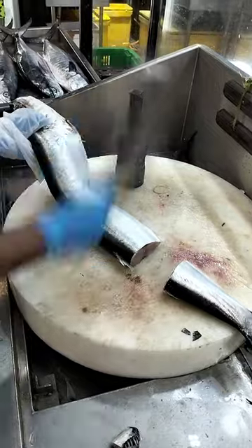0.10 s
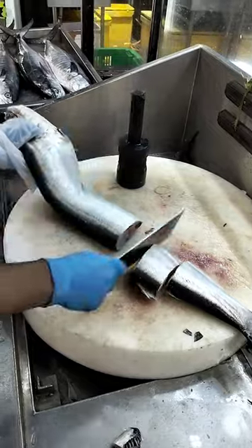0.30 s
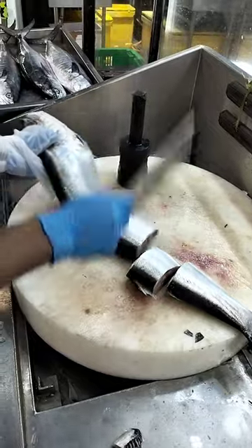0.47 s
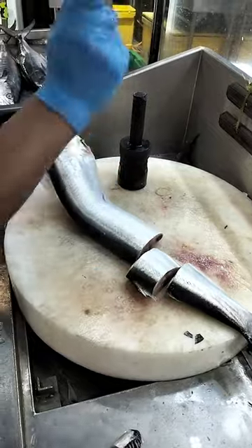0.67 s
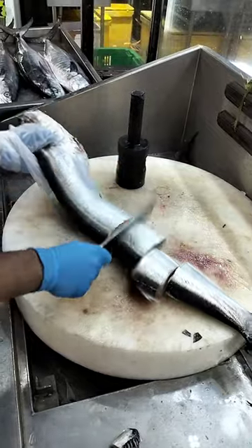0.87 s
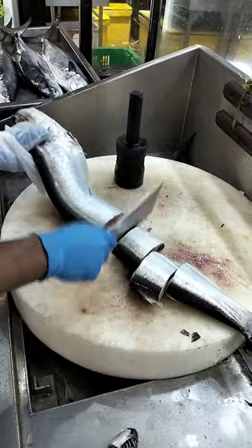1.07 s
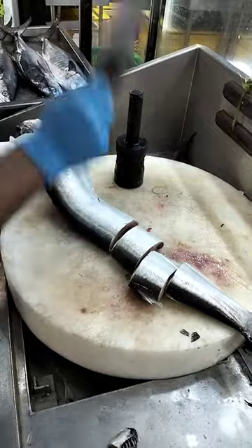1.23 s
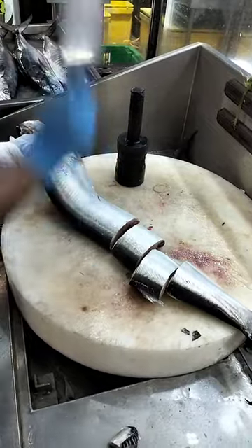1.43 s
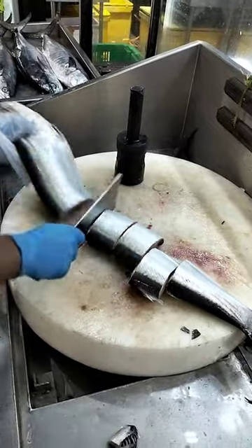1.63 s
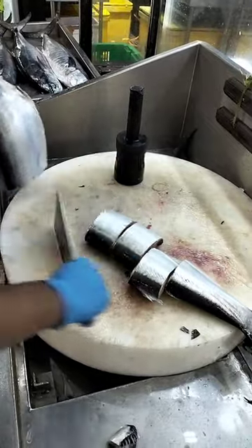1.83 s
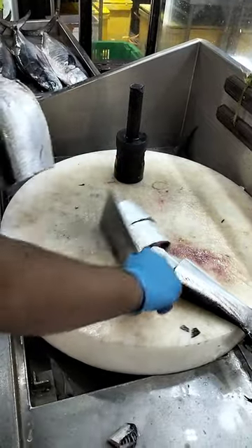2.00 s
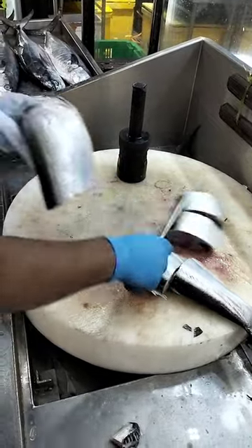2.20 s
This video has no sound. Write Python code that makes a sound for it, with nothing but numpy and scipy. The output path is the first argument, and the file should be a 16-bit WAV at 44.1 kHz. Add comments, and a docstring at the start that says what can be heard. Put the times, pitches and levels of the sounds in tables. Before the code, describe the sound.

Three hard cleaver blows thud and ring on a chopping block, followed by a metallic blade scrape

```python
"""Over low machine noise in a hall, a heavy cleaver chops three times through a fish, close to a phone.
Each blow on the thick round block in a steel basin stacks a burst of noise and a gliding squeak for the skin,
the block's ring and short modes, the basin's slow boom and a banded noise tail; noise swishes ahead of the first two.
At the end the blade scrapes the pieces aside: grainy noise through resonances, over a rumble of the basin.
Behind it all run coloured noise, a swelling hum, sparse crackles and briefly a faint thin tone."""
import sys
import numpy as np
from scipy import signal
from scipy.fft import rfft, irfft
from scipy.io import wavfile
from scipy.ndimage import uniform_filter1d

SR = 44100
rng = np.random.default_rng(int(sys.argv[2]) if len(sys.argv) > 2 else 0)


def volts_from_db(level):
    """Convert decibel levels to linear amplitude ratios."""
    exponent = np.asarray(level, float) / 20
    return 10 ** exponent


def put_to_file(sound):
    """Save the sound as 16-bit audio at rate SR, in the file named by the first command-line argument."""
    columns = np.atleast_2d(sound).T  # one column per channel
    safe = np.clip(columns, -1, 1)
    whole_steps = np.round(safe * 32767)
    wavfile.write(sys.argv[1], SR, whole_steps.astype(np.int16))


N = 101429
t = np.arange(N) / SR

# Colour of the machine noise: (frequency [Hz], relative density [dB])
HALL_COLOUR = [(40, -10), (108, -2.5), (170, -1.5), (516, -14), (1100, -16), (1400, -15), (2350, -25.5),
               (4370, -25.5), (6000, -36.5), (9000, -46.5), (11700, -41.5), (15700, -57)]
# Swelling hum: (time [s], peak level [dB])
HUM_LEVEL = [(0, -65), (.45, -44), (2.3, -37.5)]
# Faint thin tone: (time [s], level [dB])
TONE_LEVEL = [(1.359, -61), (1.438, -47.5), (1.57, -51)]
# Colour of the crackles: (frequency [Hz], relative density [dB])
CRACKLE_COLOUR = [(2000, -20), (5000, 0), (16000, -6)]
HALL_DB, HUM_HZ, TONE_HZ = -40.5, 105, 1179
CRACKLES_PER_S, CRACKLE_DB = 16, -71

# Ringing modes of the blade: frequency [Hz]
BLADE_HZ = [2480, 3520, 3860, 4010, 4790, 6120, 7000, 7660, 9070, 9420, 11330, 13200, 15400]
# The same modes' balance: (edge landing [dB], sweeping [dB], sliding out [dB])
BLADE_BALANCE = [(-12, -7.5, -17), (2, 4, -6), (-7, -3, -9), (-1, -7.5, 0), (-2, -1.5, -14),
                 (-6.5, -7.5, -14), (-24, -30, -15), (-14.5, -18, -10.5), (-23, -26, -21), (-7.5, -21, -11),
                 (-16, -16, -13), (-27, -26, -19), (-28, -34, -17)]
# Colour of the blade's rasp: (frequency [Hz], relative density [dB])
RASP_COLOUR = [(1000, -17.0), (3500, 16.5), (6000, 1), (9000, -14), (15500, -10)]
# Low scraping resonances: (frequency [Hz], width [Hz], relative level [dB])
DRAG_MODES = [(1620, 28, 1.5), (1647, 15, 6), (1730, 36, -7.5)]
# Scrape over the block: (time [s], blade level [dB], low scrape level [dB])
SCRAPE_LEVEL = [(1.93, -65, -68), (1.962, -40, -49), (2.003, -31.5, -41), (2.024, -37.5, -44),
                (2.042, -45, -59), (2.068, -34.5, -40), (2.095, -44.5, -35.5), (2.14, -41, -42),
                (2.27, -43.5, -35), (2.3, -59, -45)]
# Blade sliding out: (time [s], level [dB])
WITHDRAW_LEVEL = [(.3, -49), (.325, -44), (.355, -41.5), (.375, -46.5), (.43, -56)]
# Pieces sliding dully: (time [s], level [dB])
SHOVE_LEVEL = [(1.95, -60), (2.08, -35), (2.16, -44.5), (2.27, -32)]
# Colour of the sliding pieces: (frequency [Hz], relative density [dB])
SHOVE_COLOUR = [(100, -26.5), (145, 14), (260, -4), (600, -38)]
# Rumble of the basin: (time [s], level [dB])
RUMBLE_LEVEL = [(1.85, -50), (1.9, -32), (2.0, -30.5), (2.06, -43)]
RASP_DB, GRAIN_DB, RUMBLE_HZ = -6.5, 0.5, 86
FLICKER_DB, BLADE_WIDTH_HZ = 4.5, 36
LANDED_S = 2.08  # middle of the crossfade from landing to sweeping

# The three blows: (blade meets block [s], tail [dB], ring [dB], basin [dB], thud [dB], knock [dB],
# knock decay stretch [factor], slice [dB], bite [dB], swish [dB])
CHOPS = [(0.2083, 3.5, -1.5, -1, -3.5, -4.5, 0.76, -15, -16, -37),
         (0.9033, 2, -3, 1.5, -2, -3, 0.5, -19.5, -16.5, -33),
         (1.58, 2, -3, 6, -1.5, -4.5, 1.42, -22.5, -18, -83.5)]
# Main ring of the block, stepping down and beating away: (time after the blow [s], frequency [Hz], relative level [dB])
RING = [(0, 676, -6), (.012, 680, -8.5), (.034, 647, -5), (.043, 696, -4), (.048, 635, -17),
        (.07, 655, -17), (.09, 710, -25), (.118, 673.3, -18.5), (.14, 694.3, -42.5), (.163, 646.4, -27),
        (.185, 652, -44), (.207, 689.3, -30.5), (.26, 661.4, -45), (.305, 680, -39.5), (.38, 667, -59)]
# Low modes of the block: (frequency [Hz], relative level [dB], t60 [s], rise [s])
THUD_MODES = [(153.9, -8, 0.4, 0.019), (316.8, -17.5, 0.2, 0.0011)]
# Short upper modes of the block: (frequency [Hz], relative level [dB], t60 before stretch [s], rise [s])
KNOCK_MODES = [(601, -11.5, 0.26, 0.0069), (1244, -12, 0.27, 0.00064), (1275, -8, 0.11, 0.00091),
               (1306, -20, 0.44, 0.00087), (1943, -27, 0.27, 0.006), (2722, -20.5, 0.11, 0.00043)]
# Slow boom of the basin: (frequency [Hz], relative level [dB], t60 [s], rise [s])
BASIN_MODES = [(91.6, -14, 0.56, 0.035), (127.4, -10.5, 0.34, 0.046)]
# Colour of the clatter and hall tail: (frequency [Hz], relative density [dB])
TAIL_COLOUR = [(24, -39), (40, -8), (155, -3), (470, -12.5), (650, -7.5), (900, -13), (1240, -10.5),
               (1520, -21.5), (2840, -26), (4300, -27.5), (7000, -43.5), (16000, -50)]
# Decay of the tail's early part: (frequency [Hz], t60 [s])
TAIL_T60 = [(60, 0.22), (300, 0.4), (1100, 0.26), (3000, 0.15), (8000, .13), (16000, 0.17)]
# Colour of the slice through the skin: (frequency [Hz], relative density [dB])
SLICE_COLOUR = [(880, -8), (1810, -27), (2590, -12), (4600, -1.5), (7760, -22.5), (14300, -23),
                (16000, -37)]
# Colour of the swish: (frequency [Hz], relative density [dB])
SWISH_COLOUR = [(100, -14), (200, 11), (600, -1.5), (1300, -3.5), (2200, -46)]
MODE_SCATTER_DB, MODE_WAVER_RAD = 1.25, .35
TAIL_DB, LATE_DB, LATE_STRETCH = -16.5, -6, 3.21  # the late part is softer and longer
SLICE_PEAK_S, SLICE_RISE_S, SLICE_FALL_S = -.0025, .0017, .004
BITE_HZ, BITE_GLIDE_HZ_PER_S, BITE_S = 3900, 90000, .0014
SWISH_START_S, SWISH_RISE_S = -0.094, 0.049  # half-way point before the blow, and swell time

CEILING, TOP_HZ = 1.25, 15750


def unit(x):
    """Scale to rms 1."""
    return x / np.sqrt(np.mean(x ** 2))


def col(table, k, at=t, ends=None):
    """One column of a table drawn as a curve over time; ends is its value outside the table."""
    a = np.array(table, float)
    return np.interp(at, a[:, 0], a[:, k], ends, ends)


def over_hz(points, hz):
    """A curve over frequency, read on a log axis."""
    a = np.array(points, float)
    return np.interp(np.log(np.maximum(hz, 1)), np.log(a[:, 0]), a[:, 1])


def noise(points):
    """White noise filtered to a given colour, at rms 1."""
    spectrum = rfft(rng.standard_normal(N))
    gain = volts_from_db(over_hz(points, np.fft.rfftfreq(N, 1 / SR)))
    return unit(irfft(spectrum * gain, N))


def resonate(x, hz, width):
    """One resonance of a given width in Hz."""
    return signal.lfilter(*signal.iirpeak(hz, hz / max(width, 3), SR), x)


def walk(rate):
    """Slow random drift at rms 1: noise averaged twice over 1/rate seconds."""
    k = int(SR / rate)
    return unit(uniform_filter1d(uniform_filter1d(rng.standard_normal(N), k), k))


def bands(x, shape):
    """Split into overlapping third-octave bands, each with its own envelope."""
    spectrum = rfft(x)
    hz = np.maximum(np.fft.rfftfreq(N, 1 / SR), 1)
    out = 0
    for centre in 25 * 2 ** (np.arange(29) / 3):
        window = np.cos(np.pi / 2 * np.clip(3 * np.log2(hz / centre), -1, 1)) ** 2
        out = out + shape(centre) * irfft(spectrum * window, N)
    return out


def fall(u, t60):
    """Decay by 60 dB in t60 seconds from u = 0, silent before."""
    return (u >= 0) * volts_from_db(-60 * np.maximum(u, 0) / t60)


def modes(table, u, stretch=1):
    """Struck modes: sines that rise, waver a little in phase and die exponentially."""
    out = 0
    for hz, db, t60, rise in table:
        phase = 2 * np.pi * hz * u + MODE_WAVER_RAD * walk(38.0)
        strength = volts_from_db(db + MODE_SCATTER_DB * rng.standard_normal())
        onset = 1 - np.exp(-np.maximum(u, 0) / rise)
        out = out + strength * onset * fall(u, t60 * stretch) * np.sin(phase)
    return out


def hall():
    """Machine noise drifting band by band, noisy crackles, a wavering hum and a faint tone."""
    air = bands(noise(HALL_COLOUR), lambda hz: volts_from_db(1.7 * walk(1.1)))
    hum = volts_from_db(col(HUM_LEVEL, 1) + 2.5 * walk(6)) * np.sin(2 * np.pi * HUM_HZ * t + .9 * walk(10))
    tone = np.sqrt(2) * np.sin(2 * np.pi * TONE_HZ * t + .5 * walk(20.12))
    tone = volts_from_db(col(TONE_LEVEL, 1, ends=-120)) * tone
    ticks = (rng.random(N) < CRACKLES_PER_S / SR) * volts_from_db(6.2 * rng.standard_normal(N))
    bursts = uniform_filter1d(ticks, 260) * 260  # each tick opens the noise for 260 samples
    crackle = noise(CRACKLE_COLOUR) * bursts
    return volts_from_db(CRACKLE_DB) * crackle + volts_from_db(HALL_DB) * air + hum + tone


def blade(order, rasp_db):
    """Grainy friction rings the blade's modes, each coming and going, under a broad rasp."""
    rub = rng.standard_normal(N) * volts_from_db(GRAIN_DB * walk(160))
    ring = 0
    for hz, balance in zip(BLADE_HZ, BLADE_BALANCE):
        flicker = volts_from_db(balance[order] + FLICKER_DB * walk(32.2))
        ring = ring + flicker * unit(resonate(rub, hz, BLADE_WIDTH_HZ))
    rasp = noise(RASP_COLOUR) * volts_from_db(GRAIN_DB * walk(135))
    return unit(unit(ring) + volts_from_db(rasp_db) * unit(rasp))


def scrape():
    """Friction noise rings blade and low resonances; the pieces slide and the basin rumbles."""
    rub = rng.standard_normal(N) * volts_from_db(2.5 * walk(68))
    drag = unit(sum(volts_from_db(db) * resonate(rub, hz, width) for hz, width, db in DRAG_MODES))
    rumble = np.sqrt(2) * np.sin(2 * np.pi * RUMBLE_HZ * t + 0.63 * walk(10.6))
    settled = np.clip((t - LANDED_S) / .04 + .5, 0, 1)
    landing = np.sqrt(1 - settled) * blade(order=0, rasp_db=RASP_DB)
    sweeping = np.sqrt(settled) * blade(order=1, rasp_db=RASP_DB)
    out = volts_from_db(col(SHOVE_LEVEL, 1, ends=-120)) * noise(SHOVE_COLOUR)
    out += volts_from_db(col(SCRAPE_LEVEL, 1, ends=-120)) * (landing + sweeping)
    out += volts_from_db(col(SCRAPE_LEVEL, 2, ends=-120)) * drag
    out += volts_from_db(col(RUMBLE_LEVEL, 1, ends=-120)) * rumble
    out += volts_from_db(col(WITHDRAW_LEVEL, 1, ends=-120)) * blade(order=2, rasp_db=0.0)
    return out


def block_ring(u):
    """The block's main ring: one sine that follows a curve of pitch and level."""
    phase = 2 * np.pi * np.cumsum(col(RING, 1, u) * (u > 0)) / SR
    return volts_from_db(col(RING, 2, u, -120)) * np.sqrt(2) * np.sin(phase)


def clatter_tail(u):
    """Dense clatter and hall tail: noise whose bands die at two rates, early and late."""
    def decay(hz):
        t60 = over_hz(TAIL_T60, hz)
        return fall(u, t60) + volts_from_db(LATE_DB) * fall(u, LATE_STRETCH * t60)
    return bands(noise(TAIL_COLOUR), decay)


def skin_slice(v):
    """Thin slice through the skin: a noise burst, swelling fast and dying exponentially."""
    return noise(SLICE_COLOUR) * np.exp(np.where(v < 0, -(v / SLICE_RISE_S) ** 2 / 2, -v / SLICE_FALL_S))


def edge_bite(v):
    """The edge squeaks through the skin: a very short sine gliding upward."""
    turns = BITE_HZ * v + BITE_GLIDE_HZ_PER_S * v ** 2 / 2 + rng.random()
    return np.exp(-(v / BITE_S) ** 2 / 2) * np.sin(2 * np.pi * turns)


def air_swish(u):
    """Swish before the blow: low noise that swells and stops at contact."""
    swell = 1 / (1 + np.exp(np.clip((SWISH_START_S - u) / SWISH_RISE_S * 4, -50, 50)))
    return noise(SWISH_COLOUR) * (u < 0) * swell


def chop(s, tail_db, ring_db, basin_db, thud_db, knock_db, stretch, slice_db, bite_db, swish_db):
    """One cleaver blow: block, basin and tail sound from contact, the slice peaks just before it."""
    u = t - s
    v = u - SLICE_PEAK_S
    blow = volts_from_db(ring_db) * block_ring(u)
    blow += volts_from_db(thud_db) * modes(THUD_MODES, u)
    blow += volts_from_db(knock_db) * modes(KNOCK_MODES, u, stretch)
    blow += volts_from_db(basin_db) * modes(BASIN_MODES, u)
    blow += volts_from_db(TAIL_DB + tail_db) * clatter_tail(u)
    return blow + volts_from_db(slice_db) * skin_slice(v) + volts_from_db(bite_db) * edge_bite(v) + volts_from_db(swish_db) * air_swish(u)


def scene():
    """Hall, scrape and the three blows summed at the microphone."""
    return (hall() + scrape() + sum(chop(*row) for row in CHOPS))[None]


def top_cut(x):
    """Nothing passes above the cut-off."""
    return signal.sosfilt(signal.butter(12, 16470, fs=SR, output="sos"), x)


def record(dry):
    """The phone rounds the loudest peaks softly and cuts the top with a steep low-pass."""
    rounded = CEILING * np.tanh(dry / CEILING)
    low_pass = signal.ellip(12, .3, 60, TOP_HZ, fs=SR, output="sos")
    mix = signal.sosfilt(low_pass, rounded)
    return top_cut(mix)


dry = scene()
out = record(dry)
put_to_file(out)
```